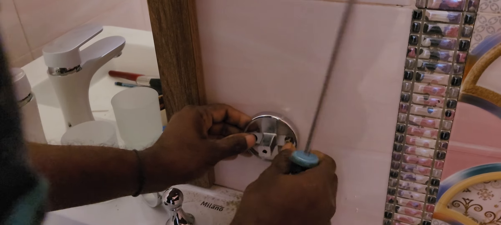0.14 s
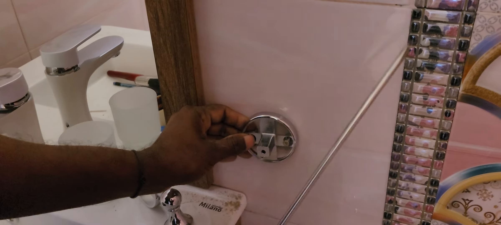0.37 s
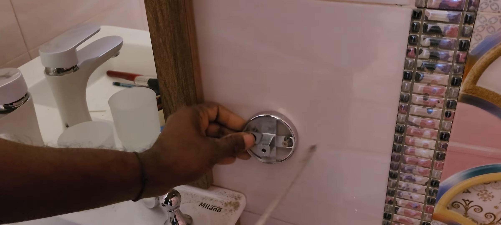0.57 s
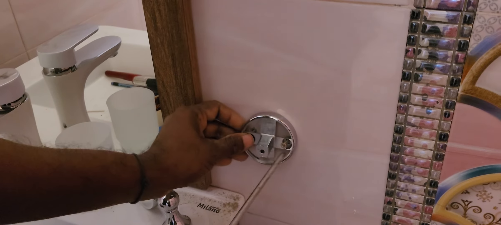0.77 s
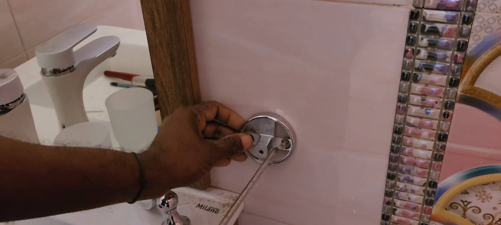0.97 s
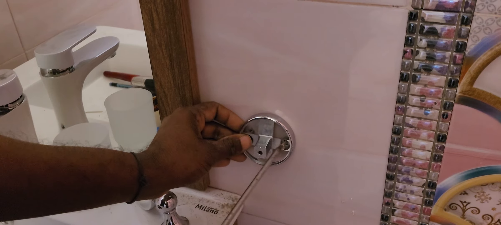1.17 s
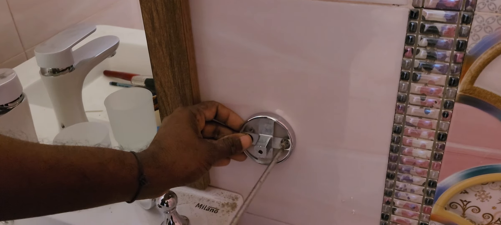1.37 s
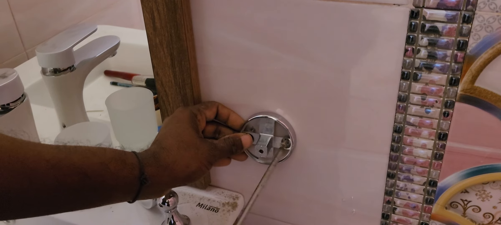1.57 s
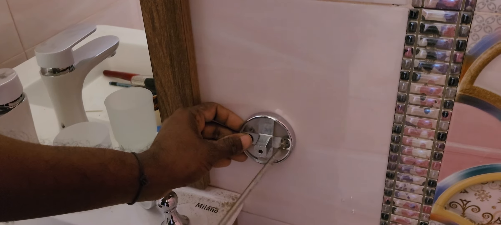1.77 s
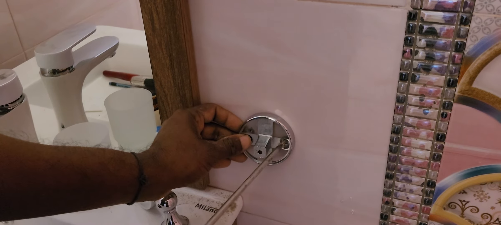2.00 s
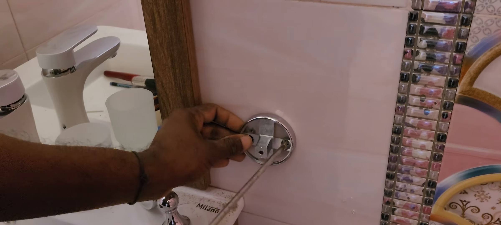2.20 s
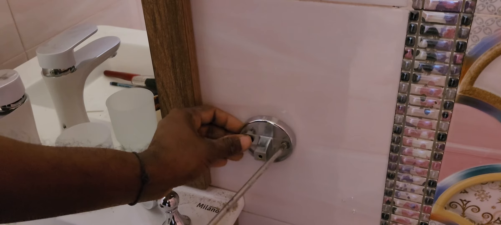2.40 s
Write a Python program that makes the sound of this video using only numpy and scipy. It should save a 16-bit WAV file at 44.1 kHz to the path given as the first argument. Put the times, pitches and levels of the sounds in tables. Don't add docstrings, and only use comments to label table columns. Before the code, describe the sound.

A screwdriver ticks sparsely against a screw and metal plate, close up in a tiled bathroom; a heavy sliding door rumbles behind the wall in the first second, then quiet clicks and a brighter ringing clink.

```python
import sys
import numpy as np
from scipy import signal
from scipy.fft import rfft, irfft
from scipy.io import wavfile
from scipy.ndimage import uniform_filter1d, map_coordinates

SR = 44100
rng = np.random.default_rng(int(sys.argv[2]) if len(sys.argv) > 2 else 0)


def wrap_up_sound(samples):
    columns = np.atleast_2d(samples).T
    tamed = np.clip(columns, -1, 1)
    steps = np.round(tamed * 32767).astype(np.int16)
    wavfile.write(sys.argv[1], SR, steps)


def magnitude_from_level(level_db):
    exponent = np.asarray(level_db, float) / 20
    return 10 ** exponent


N = 108045

# [t/s, crack level/dB, crack centre f/Hz, ring f/Hz, ring level/dB]
BLADE_TICKS = [(0.0643, -35, 11500, 8430, -39), (0.1375, -52, 12800, 12100, -41),
               (0.1421, -29, 11500, 8140, -31.5), (0.5427, -39, 8000, 3750, -29),
               (0.546, -42.5, 3300, 3120, -37), (0.552, -40.5, 13900, 15300, -39),
               (0.6755, -37.5, 9500, 6100, -44), (1.2785, -43, 4400, 5160, -48),
               (1.755, -72, 7600, 8600, -72), (1.8206, -63, 7600, 7550, -64), (1.832, -69, 8500, 8700, -69),
               (1.917, -45.5, 9000, 8400, -54), (1.9225, -38, 8600, 14500, -36),
               (1.927, -29.5, 5500, 6500, -40), (1.9293, -52, 7000, 5250, -37),
               (1.935, -44, 5500, 7800, -57), (1.945, -62, 6940, 5200, -50),
               (2.1286, -34.5, 8000, 8320, -44), (2.129, -51.5, 5500, 5080, -40),
               (2.135, -52, 9100, 8550, -39.5), (2.3658, -28.5, 5500, 4470, -23.5),
               (2.3673, -29.5, 5160, 4360, -29), (2.3697, -39, 5500, 4800, -28.5)]
# [t/s, f/Hz, level/dB, T60/s]
EXTRA_RINGS = [(0.0643, 11700, -43, 0.005), (0.0643, 6100, -52, 0.005), (0.1418, 8050, -53, 0.03),
               (0.144, 11500, -50, 0.008), (0.5431, 3400, -29, 0.008), (0.5433, 5600, -39, 0.006),
               (0.543, 8700, -44, .008), (0.5427, 12500, -46, .007), (0.544, 2000, -42, .006),
               (1.927, 3700, -43, 0.006), (1.9227, 5320, -45, .004), (1.9227, 6800, -45, .004),
               (1.925, 8300, -45, .004), (2.366, 3130, -31, 0.014), (2.3655, 8500, -32, 0.012)]
# [f/Hz, level/dB, T60/s]
PLATE_MODES = [(3060, 2.5, 0.32), (3300, -13, 0.51), (3900, 0, 0.15), (4320, -20, 0.15), (4500, -16, 0.16),
               (5500, -8, 0.08), (6660, -14.5, 0.18), (7380, -7.5, 0.2), (8600, -11, .05),
               (10400, -9, 0.19), (10700, -24, 0.25), (12250, -6, 0.1), (13110, -16, 0.29),
               (14600, -8, 0.15)]
# [t/s, length/s, level/dB, centre f/Hz]
THREAD_RUBS = [
    (1.909, .05, -57, 7500),
    (1.925, .3, -52, 9000),
    (2.132, .22, -53, 7500),
    (2.255, .45, -65, 10000),
    (0.08, .4, -58, 3150),
    (0.55, .2, -53, 3600),
    (2.368, .2, -50, 7000),
]
# [f/Hz, T60/s]
BATH_DECAY = [(200, .9), (2000, 0.7), (4000, .45), (6000, 0.33), (15000, 0.15)]
# [t/s, panel rumble level/dB, brightness level/dB, wall weight level/dB]
DOOR_TRAVEL = [(0.0, -38, -10, -12), (0.15, -40, -14, -13), (0.18, -28, -13, -15.5),
               (0.28, -25, -14.5, -14.5), (0.32, -20, -20, -15.5), (0.38, -27.5, -7.5, -13.5),
               (0.45, -17.5, -11, -18), (0.52, -20.5, -11, -16), (0.6, -16, -15, -15),
               (0.7, -21, -15.5, -14), (0.82, -19.5, -20, -20), (0.87, -26.5, -16, -9),
               (0.98, -31.5, -14, -8), (1.14, -41, -12.5, -3.5), (1.4, -49, -12.5, -18.5),
               (1.64, -55, -16, -55), (1.9, -64, -21, -21), (2.45, -55, -14, -19)]
# [f/Hz, width/Hz, level/dB]
PANEL_MID = [(175, 11.2, -12), (199.3, 14, -8.5), (236.5, 6.9, 0.5), (269.9, 7.2, -4.5), (310, 19, -7),
             (342.76, 8.2, -0.5), (360.7, 10.4, -5), (383, 11.3, -7), (439.5, 16.2, -4.5), (485, 42, -6)]
PANEL_HIGH = [(568.6, 30.6, -2.5), (626, 26, -5.5), (769.6, 79, -7), (825, 50, -13.5), (899, 70, -9.5),
              (975.6, 13.2, -13), (1097, 170, -17)]
PANEL_LOW = [(58.4, 6.4, -7.5), (99.1, 12, -1), (140.5, 20, 0)]
# [t/s, hiss level/dB]
TRACK_DRAG = [
    (0.0, -51.5),
    (0.14, -48),
    (0.22, -43.5),
    (0.4, -48),
    (0.55, -40),
    (0.75, -43.5),
    (1.0, -48),
    (1.1, -55),
    (1.5, -65.5),
    (2.45, -61.5),
]
# [f/Hz, level/dB per Hz]
HISS_COLOUR = [(590, 4), (1000, -1), (1290, -6), (1630, -4.5), (4120, -12), (6940, -13), (8850, -23.5),
               (13900, -23.5), (16000, -33)]
# [f/Hz, width/Hz, level/dB]
ROLLER_MODES = [(2700, 400, -68.5), (4610, 93, -64.5), (6270, 13, -71.5), (6820, 93, -65),
                (13370, 250, -70.5)]
# [t/s, level/dB]
ROLLER_CONTACT = [
    (0.12, -30),
    (0.22, -1),
    (0.6, 0.1),
    (1.0, -3),
    (1.1, -14),
    (1.3, -40),
]
# [t/s, f/Hz, level/dB]
AXLE_WHISTLE = [
    (0.27, 10800, -100),
    (0.35, 10800, -66),
    (0.45, 10800, -74),
    (0.65, 10800, -70),
    (1.0, 11250, -74),
    (1.12, 11600, -70),
    (1.17, 10300, -80),
    (1.22, 9500, -100),
]
# [t/s, f/Hz, level/dB, T60/s]
WALL_THUDS = [(1.3, 270, -46, .5), (1.425, 268, -46, .9), (1.655, 272, -50, .3), (1.49, 205, -54, 1),
              (1.94, 166, -52, .25), (1.94, 232, -56, .4), (2.135, 165, -50, 0.45), (2.16, 203, -53, 1.2),
              (2.125, 240, -56, .5), (2.385, 235, -46, .6), (2.385, 195, -50, .6), (2.378, 378, -45, .25),
              (2.375, 300, -55, .2)]
# [f/Hz, level/dB per Hz]
HUM_COLOUR = [(24, -37), (40, -35), (276, 8.5), (312, 3), (1340, -8.5), (1440, -1), (2000, -11),
              (2500, -10.5), (16000, -93)]
# [f/Hz, width/Hz, level/dB]
HUM_PEAKS = [(930, 30, -70), (1626, 24, -71.5), (3750, 220, -79.5), (4820, 670, -76.5)]
# [f/Hz, likeness 0-1]
LIKENESS = [(60, 0.78), (250, 0.9), (500, 0.63), (1000, 0), (4000, 0.01), (12000, 0)]
# [f/Hz, level/dB]
SIDE_LEVEL = [(60, -17), (130, -20), (235, -17), (345, -12), (600, -4.5), (1200, 1.0), (8000, 0)]

TOOL_PAN_DB = -3.2


def screwdriver():
    crack_t60_s, ring_t60_s = 0.016, 0.006
    out, t = np.zeros(N), np.arange(2000) / SR
    noises = rng.standard_normal((len(BLADE_TICKS), 2000))
    for (s, db, crack_hz, hz, ring_db), noise in zip(BLADE_TICKS, noises):
        crack = magnitude_from_level(db - 60 * t / crack_t60_s) * band(noise, crack_hz, 1.07)
        tick = crack + knock(magnitude_from_level(ring_db) * (t == 0), hz, ring_t60_s)
        i = int(s * SR)
        out[i:i + 2000] += tick[:N - i]
    for s, hz, db, t60 in EXTRA_RINGS:
        out += knock(click(s, db), hz, t60)
    return out + plate()


def plate():
    clink_s, clink_db = 2.366, -31.5
    out = np.zeros(N)
    splits = rng.uniform(-1.09, 1, (len(PLATE_MODES), 6)) * 0.03
    for (hz, db, t60), split in zip(PLATE_MODES, splits):
        strike = click(clink_s, clink_db + db - 14)
        for d in split:
            out += ring(strike, hz + d * min(hz, 5000), t60)
    return out


def thread():
    out, t = 0, np.arange(N) / SR
    for s, length, db, hz in THREAD_RUBS:
        since = np.maximum(t - s, 0) / length
        shape = np.minimum(since * 12, 1) * magnitude_from_level(-30 * since)
        grain = magnitude_from_level(db + 2.5 * drift(150))
        octaves = 1.3 * (hz / 10000) ** 1.8
        out = out + grain * shape * band(rng.standard_normal((2, N)), hz, octaves)
    return out


def bathroom(x):
    t, tail = np.arange(SR // 2) / SR, 0
    for low in 400 * 2.0 ** np.arange(0, 5.5, 0.5):
        sos = signal.butter(2, [low, low * np.sqrt(2)], "band", fs=SR, output="sos")
        noise = signal.sosfilt(sos, rng.standard_normal((2, len(t))))
        tail = tail + noise * magnitude_from_level(-60 * t / at_hz(BATH_DECAY, low))
    tail = tail * np.clip((t - 0.002) / 0.00067, 0, 1)
    tail = tail / np.sqrt(np.sum(tail ** 2) / 2)
    return signal.fftconvolve(x[None], tail, axes=1)[:, :N]


def door():
    db, bright_db, weight_db = in_time(DOOR_TRAVEL)
    panel = rms_one(resonant_noise(PANEL_MID))
    panel = panel + magnitude_from_level(bright_db) * rms_one(resonant_noise(PANEL_HIGH))
    panel = panel + magnitude_from_level(weight_db) * rms_one(resonant_noise(PANEL_LOW))
    rumble = magnitude_from_level(db + 1.0 * drift(23.94)) * panel
    air_pan_db = -3.5
    return rumble + pan(air_pan_db) * (track_hiss() + rollers() + whistle())


def track_hiss():
    return magnitude_from_level(in_time(TRACK_DRAG)[0]) * shaped_noise(HISS_COLOUR)


def rollers():
    return magnitude_from_level(in_time(ROLLER_CONTACT)[0] + 4.5 * drift(14.79)) * resonant_noise(ROLLER_MODES)


def whistle():
    hz, db = in_time(AXLE_WHISTLE)
    wobble_hz = 40
    phase = np.cumsum(2 * np.pi * (hz + wobble_hz * drift(150)) / SR)
    return magnitude_from_level(db) * drift(210) * np.sin(phase)


def pushes():
    soft = signal.windows.hann(130) / 65
    thuds = 0
    for s, hz, db, t60 in WALL_THUDS:
        thuds = thuds + signal.fftconvolve(ring(click(s, db), hz, t60), soft)[:N]
    return signal.sosfilt(signal.butter(4, 120, "high", fs=SR, output="sos"), thuds)


def room_hum():
    return magnitude_from_level(-57.5) * shaped_noise(HUM_COLOUR) + resonant_noise(HUM_PEAKS)


def resonant_noise(peaks):
    steady = 0.55
    out = 0
    for hz, width_hz, db in peaks:
        t60 = np.log(1000) / np.pi / (1.5 * width_hz)
        noise = rng.standard_normal((2, N + 8000))
        both = ring(ring(noise, hz, t60), hz, t60)[:, 8000:]
        sway = uniform_filter1d(rms_one(both) ** 2, size=int(4 * SR / hz), axis=1) + 0.05
        mid, side = both / sway ** (steady / 2)
        side = magnitude_from_level(at_hz(SIDE_LEVEL, hz)) * rms_one(side)
        out = out + magnitude_from_level(db) * (rms_one(mid) + side * [[1], [-1]])
    return out


def shaped_noise(spectrum):
    hz = np.maximum(np.fft.rfftfreq(N, 1 / SR), 1)
    alike = np.clip(at_hz(LIKENESS, hz), -1, 1)
    mid, side = rfft(rng.standard_normal((2, N))) * magnitude_from_level(at_hz(spectrum, hz))
    both = np.sqrt(1 + alike) * mid + np.sqrt(1 - alike) * side * [[1], [-1]]
    return rms_one(irfft(both, N))


def band(noise, hz, octaves):
    edges = np.clip(hz * 2.0 ** np.array([-octaves, octaves]), 100, 0.45 * SR)
    return rms_one(signal.sosfilt(signal.butter(2, edges, "band", fs=SR, output="sos"), noise))


def ring(clicks, hz, t60):
    r, w = magnitude_from_level(-60 / (t60 * SR)), 2 * np.pi * hz / SR
    return signal.lfilter([0, np.sin(w)], [1, -2 * r * np.cos(w), r * r], clicks + 1e-18)


def knock(clicks, hz, t60):
    return ring(ring(clicks, hz, t60), hz, t60) * 2 * np.e * np.log(1000) / (t60 * SR)


def click(s, db):
    out = np.zeros(N)
    out[int(s * SR)] = magnitude_from_level(db)
    return out


def drift(rate):
    knots = rng.standard_normal(400)
    return map_coordinates(knots, [np.arange(N) / SR * rate], order=3)


def rms_one(x):
    return x / np.sqrt(np.mean(x ** 2) + 1e-20)


def in_time(rows):
    s, *columns = np.transpose(rows)
    return [np.interp(np.arange(N) / SR, s, c) for c in columns]


def at_hz(points, hz):
    table_hz, value = np.array(points).T
    return np.interp(np.log(hz), np.log(table_hz), value)


def pan(db):
    return magnitude_from_level(np.array([[db / 2], [-db / 2]]))


def scene():
    thin = signal.butter(2, 1700, "high", fs=SR, output="sos")
    tool = signal.sosfilt(thin, screwdriver())
    t = np.arange(N) / SR
    in_hand = (t > 0.4) & (t < 0.65)
    right = np.where(in_hand, tool, np.roll(tool, 7))
    direct = np.array([tool, right]) * np.where(in_hand, pan(2.5), pan(TOOL_PAN_DB))
    room = bathroom(tool * magnitude_from_level(np.where(in_hand, -11, -2.5)))
    return direct + pan(TOOL_PAN_DB) * (room + thread()) + pushes() + door() + room_hum()


def top_cut(x):
    return signal.sosfilt(signal.butter(12, 16750, fs=SR, output="sos"), x)


def record(dry):
    rounded = 0.6 * np.tanh(dry / 0.6)
    cut = signal.sosfilt(signal.cheby2(12, 60, 16700, fs=SR, output="sos"), rounded)
    cut = signal.sosfilt(signal.butter(4, 51, "high", fs=SR, output="sos"), cut)
    return top_cut(cut)


dry = scene()
out = record(dry)
wrap_up_sound(out)
```